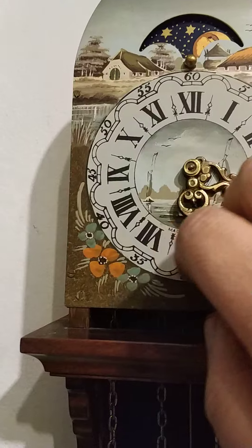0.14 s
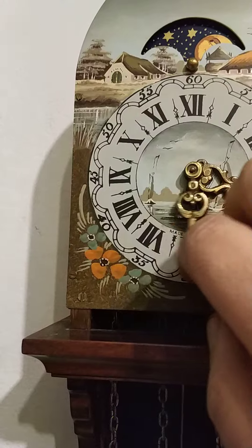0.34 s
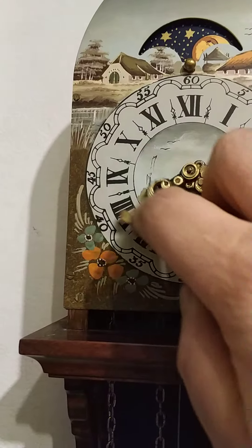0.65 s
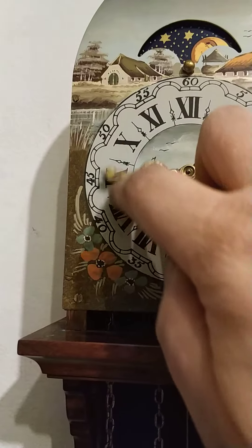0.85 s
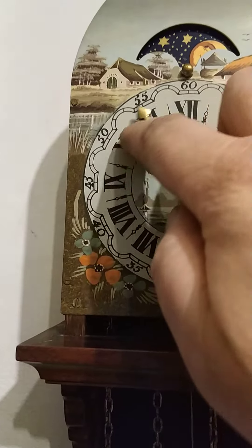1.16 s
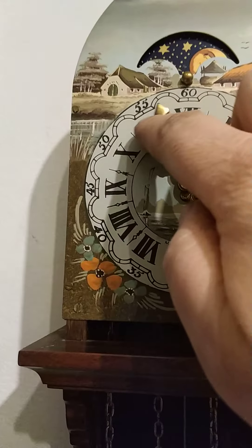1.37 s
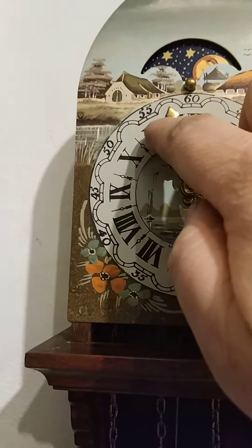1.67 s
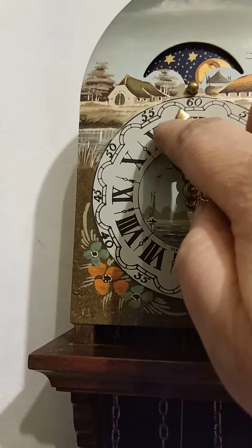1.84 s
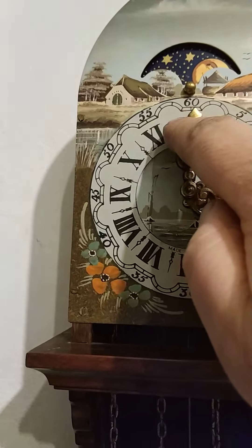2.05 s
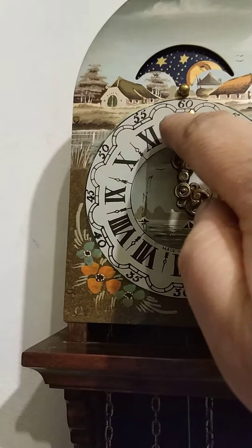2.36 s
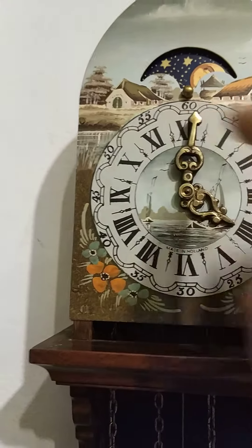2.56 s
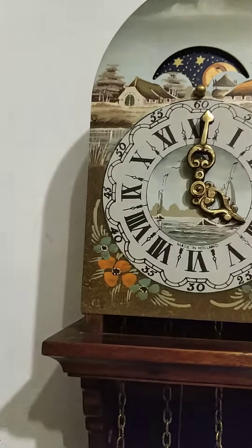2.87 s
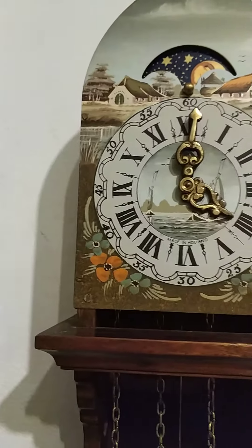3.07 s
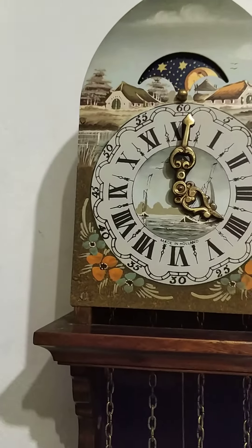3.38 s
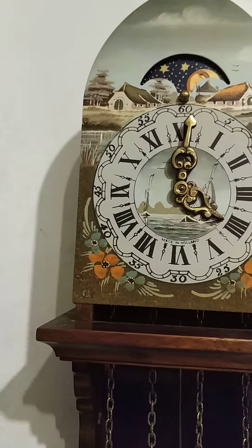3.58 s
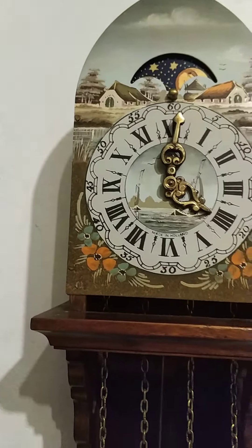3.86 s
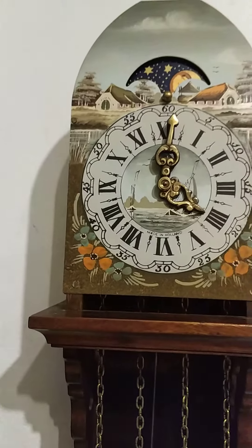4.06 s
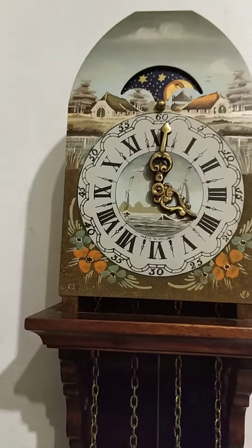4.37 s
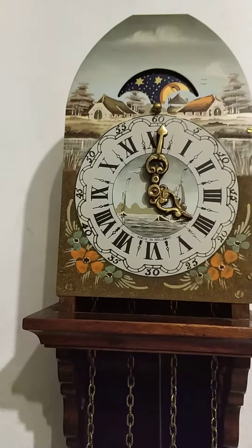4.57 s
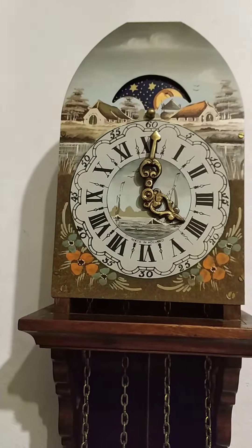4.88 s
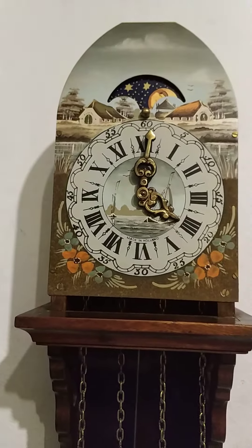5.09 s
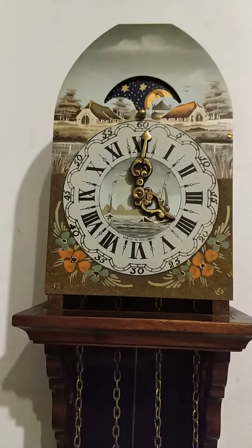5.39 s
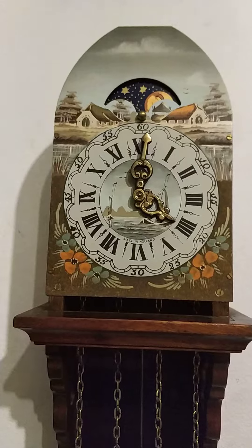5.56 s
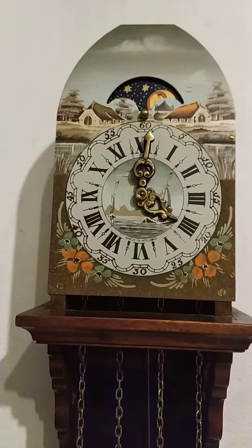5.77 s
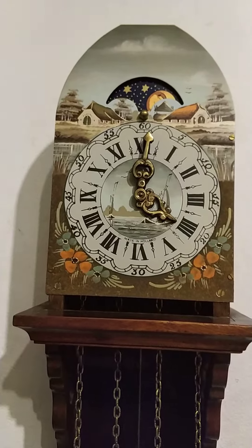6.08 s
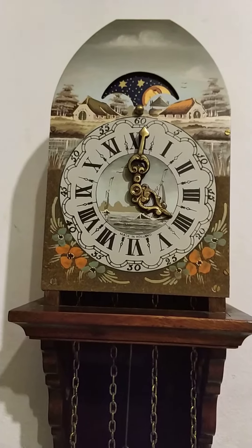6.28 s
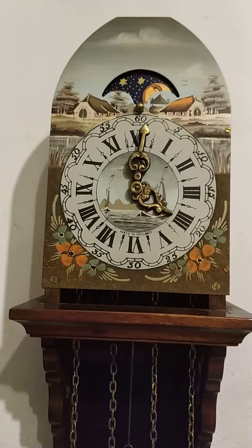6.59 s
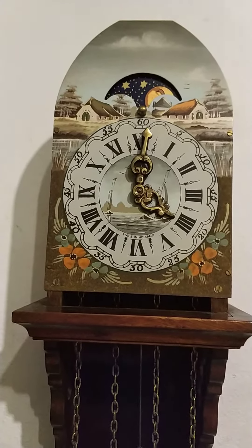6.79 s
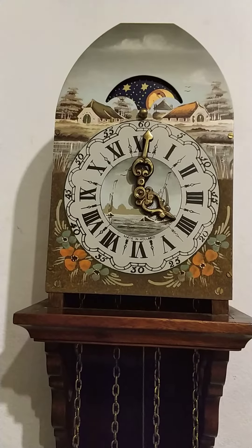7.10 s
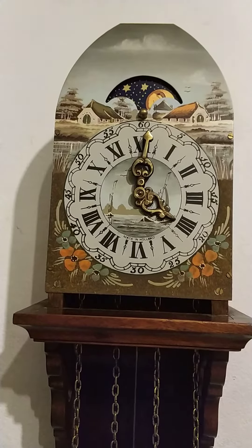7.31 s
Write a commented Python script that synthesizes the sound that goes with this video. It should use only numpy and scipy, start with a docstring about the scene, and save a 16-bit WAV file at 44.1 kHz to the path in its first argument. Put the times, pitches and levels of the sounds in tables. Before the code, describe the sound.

Quiet ticking and faint metallic hum, then a small rattling drop, a thin mechanical whirr and three clear, long-ringing bell strokes from a pendulum clock.

```python
"""Wall clock striking three

A hand turns a pendulum wall clock to the hour in a quiet room, close to a phone that slowly backs away.
The bell still hums from an earlier blow; a lever drops, the strike train whirrs and the hammer hits three times.
The escapement ticks throughout and two further clocks tick faintly elsewhere in the room.
Knocks are scraping noise that rings small parts, the bell is beating sine pairs, train and room are shaped noise."""
import sys
import numpy as np
from scipy import signal
from scipy.fft import rfft, irfft
from scipy.io import wavfile
from scipy.ndimage import uniform_filter1d

SR = 44100
rng = np.random.default_rng(int(sys.argv[2]) if len(sys.argv) > 2 else 0)


def natural_amplitude(level_db):
    """Convert a level in decibels to a linear amplitude factor, elementwise."""
    exponent = np.asarray(level_db, float) / 20
    return 10 ** exponent


def materialize(psi):
    """Save the field psi as 16-bit PCM at rate SR to the path in sys.argv[1].

    A 1-D psi becomes a single channel; in a 2-D psi each row is a channel.
    """
    bounded = np.clip(np.atleast_2d(psi).T, -1, 1)
    quanta = np.round(bounded * 32767).astype(np.int16)
    wavfile.write(sys.argv[1], SR, quanta)


N = 328104  # samples, about 7.4 s

# Hammer blows, levels before each layer's own gain: (time [s], peak [dB], wooden thud peak [dB],
# faint soft onset just before the blow [dB], sag of the train under the lift [dB])
BLOW_TABLE = [(3.6674, -12, -29.5, -29, -12), (5.166, -13, -32, -31.5, -11.5), (6.632, -11, -28, -38, -21)]
# Resonances of the hollow wooden case: (frequency [Hz], relative level [dB], time to fall 60 dB [s])
CASE_MODES = [(318, -5.5, 0.4), (384, -4, 0.27), (468, 2.5, 0.086), (513, -2.5, .08), (513.6, -24, 3.3),
              (234, -9, .07)]
# Resonances of the movement's plate: (frequency [Hz], relative level [dB], time to fall 60 dB [s])
PLATE_MODES = [(923.6, -1.5, 0.062), (1170, -1, 0.011), (1675, -1.5, .05), (1749, 2, .03),
               (2430, -1.5, 0.005)]
# Resonances of the wheels: (frequency [Hz], relative level [dB], time to fall 60 dB [s])
WHEEL_MODES = [(3474, 11.5, 0.014), (4160, 17.5, 0.0022), (4800, -4, 0.009), (8000, -22, 0.0072),
               (9600, -29.5, 0.041)]


def level(x, db):
    """Scale to an rms level."""
    return x * natural_amplitude(db) / np.sqrt(np.mean(x ** 2))


def band(x, hz, width):
    """Two-pole resonance, gain 1 at the centre."""
    return signal.lfilter(*signal.iirpeak(hz, hz / width, fs=SR), x)


def flicker(rate, db):
    """Gain that wanders at random about rate times a second."""
    steps = rng.standard_normal(999)
    return natural_amplitude(db * np.interp(np.arange(N) / SR * rate, np.arange(999), steps))


def every(period_s, first):
    """Repeat a (time [s], level [dB], ..) beat to the end, each time a little louder or softer."""
    scatter_db = 1.5
    s = np.arange(first[0], N / SR, period_s)
    return np.c_[s, first[1:] + scatter_db * rng.standard_normal((len(s), 1))]


def knocks(events, modes, contact_s):
    """Each (time [s], peak [dB]) event shakes the modes with its own short scrape of noise."""
    out = np.zeros(N + 2 * SR)
    t = np.arange(int(0.8 * SR)) / SR
    ring = sum(natural_amplitude(db) * np.sin(2 * np.pi * hz * t) * 1000.0 ** (-t / t60) for hz, db, t60 in modes)
    press = t[:4096] / contact_s
    force = (1 - np.exp(-3 * press)) ** 2 * np.exp(-press)  # rises fast and dies away
    for s, db in events:
        scrape = rng.standard_normal(4096) * force
        hit = np.diff(signal.fftconvolve(ring, scrape))  # small parts radiate little bass
        start = int(s * SR)
        out[start:start + len(hit)] += hit * natural_amplitude(db) / np.abs(hit).max()
    return out[:N]


def room():
    """Still air and microphone hiss: coloured noise whose half-octave bands waver on their own."""
    # Tone colour of the hiss: (frequency [Hz], relative level per Hz [dB])
    hiss_colour = [(100, -17.5), (250, -11.5), (500, -18.5), (1200, -22.5), (2000, -22.5), (3000, -23),
                   (5300, -28), (9100, -29), (11000, -56)]
    hz = np.fft.rfftfreq(N, 1 / SR) + 1
    colour_hz, colour_db = np.transpose(hiss_colour)
    colour = natural_amplitude(np.interp(np.log(hz), np.log(colour_hz), colour_db))
    noise = rfft(rng.standard_normal(N)) * colour
    out = 0
    for octave in np.arange(5, 14.5, 0.5):  # band centres are 2 ** octave Hz
        share = np.clip(1 - 2 * np.abs(np.log2(hz) - octave), 0, 1)
        out = out + irfft(noise * share, N) * flicker(7.9, 2.0)
    return level(out, -69)


def clocks():
    """Two other clocks blurred by distance, and faint stray creaks and ticks from all round."""
    # Body of the dull clock: (frequency [Hz], relative level [dB], time to fall 60 dB [s])
    dull_body = [(860, 6, 0.011), (841, -7.5, 0.31), (960, -9.5, 0.052)]
    # Treble of the dull clock: (frequency [Hz], relative level [dB], time to fall 60 dB [s])
    dull_bright = [(2232, -1.5, 0.046), (4000, -14, 0.035), (4530, -3, 0.013), (5440, -29, .04)]
    # Body of the thin clock: (frequency [Hz], relative level [dB], time to fall 60 dB [s])
    thin_body = [(857, -9, 0.2), (1635, -1, 0.08), (5230, -31, 0.048)]
    # First beats of the dull clock: (time [s], body peak [dB], treble peak [dB])
    dull_tick = (.587, -52.5, -54)
    dull_tock = (1.185, -58, -58)
    # First beats of the thin clock: (time [s], peak [dB])
    thin_tick = (.3267, -52.5)
    thin_tock = (.947, -51.5)
    dull_period_s, thin_period_s = 1.2284, 1.3323

    beats = np.vstack([every(dull_period_s, dull_tick), every(dull_period_s, dull_tock)])
    dull = knocks(beats[:, :2], dull_body, 0.014) + knocks(beats[:, ::2], dull_bright, 0.022)

    thin = knocks(every(thin_period_s, thin_tick), thin_body, 0.015)
    thin = thin + knocks(every(thin_period_s, thin_tock), dull_body, 0.0041)

    stray = rng.random((60, 2)) * [N / SR, 12.0] + [0, -70.0]  # (time [s], level [dB])
    creaks = knocks(stray[::2], dull_body, 0.019) + knocks(stray[1::2], PLATE_MODES, 0.011)
    creaks = creaks + natural_amplitude(4) * knocks(stray[::3], dull_bright, 0.0069)
    return dull + thin + creaks


def train():
    """Pinion teeth patter densely on the plate while the fly spins; each resonance flutters alone."""
    # Resonances under the patter: (frequency [Hz], width [Hz], relative level [dB])
    patter_modes = [(951, 100, -16), (1705, 90, 0.5), (2140, 990, -8), (3440, 450, 0.5), (4167, 71, 6.5),
                    (4360, 90, 8.5), (5200, 100, -6.5), (5940, 1200, -42), (9150, 240, -9)]
    # How the train sags around each blow: (time from the blow [s], share of the sag [0-1])
    lift_shape = [(-0.39, 0), (-.45, .2), (-0.22, 0.65), (-0.095, 0.8), (-.05, 0.11), (0.8, 0),
                  (0.3, 0.018)]
    start_s, spin_up_s = 2.193, 0.16
    t = np.arange(N) / SR

    strikes = rng.random(N) < 700 / SR  # about 700 a second
    teeth = strikes * rng.standard_normal(N) * natural_amplitude(3.5 * rng.standard_normal(N))
    push = level(teeth, 0) + 1.9 * rng.standard_normal(N)
    body = 0
    for hz, width, db in patter_modes:
        ringing = level(band(push, hz, width), 0) * np.sqrt(width)
        body = body + natural_amplitude(db) * flicker(30, 3.5) * ringing

    sag_db = 0
    for blow in BLOW_TABLE:
        sag_db = sag_db + blow[-1] * np.interp(t - blow[0], *np.transpose(lift_shape), left=0, right=0)
    spin_up = np.clip((t - start_s) / spin_up_s, 0, 1)
    return level(body, -56.5) * natural_amplitude(sag_db) * spin_up


def movement():
    """Every tick rings the plate and the wheels in its own balance; the lever's bounces are brief but blunt."""
    # Escapement ticks: time [s]
    tick_times = [0.4202, 1.0012, 1.595, 2.167, 2.7852, 3.3569, 3.927, 4.537, 5.13, 5.7153, 6.317, 6.8902]
    # Clicks of levers under the turning hand, before gain: (time [s], plate peak [dB], wheel peak [dB])
    lever_clicks = [(1.3089, -42, -36.5), (1.4462, -37.5, -39.5)]
    # A dropped lever bounces to rest, before gain: (time [s], plate peak [dB], wheel peak [dB])
    lever_bounces = [(2.0206, -42, -32.5), (2.0266, -28, -31), (2.054, -31.5, -39.5), (2.058, -52, -30),
                     (2.0672, -30.5, -45), (2.081, -35, -40.5), (2.091, -53, -39.5), (2.1015, -36, -51),
                     (2.110, -38, -46)]
    # A finger lifts a lever that grates on its stop: (time [s], peak [dB])
    grate_times = [(1.48, -41), (1.497, -49)]
    # Resonance of that lever: (frequency [Hz], relative level [dB], time to fall 60 dB [s])
    grate_modes = [(2770, -1, 0.024)]
    # Faint bright flecks of sound near the dial: (time [s], peak [dB])
    fleck_times = [(.01, -56.5), (.51, -64), (.89, -59), (1.09, -63), (1.16, -54), (1.23, -59), (1.39, -65),
                   (1.66, -63), (1.87, -59)]
    # Resonances of the flecks: (frequency [Hz], relative level [dB], time to fall 60 dB [s])
    fleck_modes = [(3740, -8, 0.028), (4350, -6, 0.037), (5630, 3, 0.039)]
    # Soft low bumps in the wooden case: (time [s], peak [dB])
    case_bumps = [(.1, -52.5), (1.385, -61.5), (2.36, -58.5), (3.33, -60)]

    # ticks fade, and grow duller faster still, as the phone backs away
    s = np.array(tick_times)
    plate_scatter, wheel_scatter = 2 * rng.standard_normal((2, len(s)))  # dB
    beats = np.c_[s, -41 - 0.13 * s + plate_scatter, -36.5 - 2 * s + wheel_scatter]
    # a faint soft onset is heard 12 ms before each blow
    onsets = [(blow[0] - 0.012, blow[3], blow[3] - 13.5) for blow in BLOW_TABLE]
    ticks = np.vstack([beats, lever_clicks, onsets])
    soft = knocks(ticks[:, :2], PLATE_MODES, 0.0069)
    soft = soft + natural_amplitude(3.5) * knocks(ticks[:, ::2], WHEEL_MODES, 0.0028)

    lever = np.array(lever_bounces)
    hard = knocks(lever[:, :2], PLATE_MODES, 0.0015)
    hard = hard + natural_amplitude(12) * knocks(lever[:, ::2], WHEEL_MODES[:3], 0.0015)

    # 24 small rattles at random moments within 0.11 s of the drop
    when, softness = rng.random((2, 24))
    rattles = np.c_[2.022 + 0.11 * when, -34 - 3 * when - 6 * softness]
    rattle = knocks(rattles, WHEEL_MODES[:3], 0.0026)
    blunt = uniform_filter1d(hard + rattle, size=4)  # softens the extreme treble

    grate = knocks(grate_times, grate_modes + PLATE_MODES[-1:], 0.0044)
    flecks = knocks(fleck_times, fleck_modes, 0.0062)
    bumps = knocks(case_bumps, CASE_MODES, 0.012)
    return soft + blunt + grate + flecks + bumps


def hammer():
    """The hammer chatters on the bell, cracks through the movement and thuds in the hollow case."""
    # Short-lived bell resonances: (frequency [Hz], relative level [dB], time to fall 60 dB [s])
    clang_modes = [(1424, -22, 0.35), (3423, -7, .08), (5980, -11.5, 0.013), (8860, -7.5, 0.05)]
    s, peak_db, thud_db = np.array(BLOW_TABLE).T[:3]
    blows, thuds = np.c_[s, peak_db], np.c_[s, thud_db]
    metal = WHEEL_MODES + PLATE_MODES
    clang = knocks(blows, clang_modes, 0.006)
    crack = knocks(blows, metal, 0.014) + natural_amplitude(0.5) * knocks(blows, metal, 0.00098)
    thud = knocks(thuds, CASE_MODES, 0.00025) + natural_amplitude(-11.5) * knocks(thuds, CASE_MODES, 0.033)
    return natural_amplitude(-2) * clang + natural_amplitude(-12) * crack + thud


def twins(k):
    """One bell partial split into two close tones that beat; every blow leaves them in a new balance."""
    # Each pair of tones: (lower twin [Hz], beat rate [Hz])
    pair_tones = [(1319.81, 5.69), (3399.95, 1.69), (5965.8, 3.5), (8907.2, .85)]
    # Time to fall 60 dB: (lower twin [s], upper twin [s])
    pair_decays = [(10, 18.), (7.8, 2.28), (2.69, 2.445), (0.98, 0.55)]
    # Ring left by each blow or jolt, before later gains, one list a partial (hum, mid, ting, top):
    # (time [s], lower twin [dB], upper twin [dB], delay to the first swell [s])
    pair_rings = [
        [(0, -58, -58.5, 0.029), (2.06, -47.5, -49.5, .16), (3.67, -40, -44, 0.011), (5.169, -48, -40.5, .16),
         (6.637, -49, -44, 0.13)],
        [(0, -39, -50.5, 0.35), (2.06, -63, -66.5, 0.31), (3.67, -37.5, -43.5, .56), (5.169, -48.5, -36, 0.16),
         (6.637, -55.5, -37.5, 0.069)],
        [(3.67, -22, -24, 0.16), (5.169, -23, -18, .19), (6.637, -30, -28, .2)],
        [(3.67, -16, -16, .64), (5.169, -21, -11.5, .72), (6.637, -19.5, -16.5, 0.83)],
    ]
    # Each partial swells and sinks as the phone moves through the room's standing waves,
    # one list a partial: (time [s], gain [dB])
    pair_sway = [
        [(0, 0.5)],
        [(1.1, 0.35), (2., -2.5), (4.4, 0.5), (4.63, -3), (4.85, 2.5), (5.13, -1), (5.2, 0.3), (5.85, 1.5),
         (5.99, -11.5), (6.27, -18), (6.4, 2.5), (6.62, 8.5), (6.66, 0.3)],
        [(3.7, 6.5), (3.76, -3), (3.8, -11.5), (3.88, 2.5), (4.1, -4.5), (4.5, -5), (4.9, 2.5), (5.15, 8.5),
         (5.18, -0.43)],
        [(3.8, 0.4), (3.95, -3), (4.07, 7), (4.29, -10), (4.39, 2), (4.55, -5), (5.36, 0.9), (5.41, -4.5),
         (5.47, 4.5), (5.6, -2.2)],
    ]

    hz, beat_hz = pair_tones[k]
    low_t60, high_t60 = pair_decays[k]
    rings = np.array(pair_rings[k])
    t = np.arange(N) / SR
    last = np.searchsorted(rings[:, 0], t, side="right") - 1  # latest blow, -1 before the first
    start, low_db, high_db, swell = rings[np.maximum(last, 0)].T
    age = np.maximum(t - start, 0)

    # complex envelopes, as seen from the lower twin: the upper one turns at the beat rate
    lower = natural_amplitude(low_db) * 1000.0 ** (-age / low_t60)
    upper = natural_amplitude(high_db) * 1000.0 ** (-age / high_t60) * np.exp(2j * np.pi * beat_hz * (age - swell))
    sway = natural_amplitude(np.interp(t, *np.transpose(pair_sway[k])))
    shape = (lower + upper) * (last >= 0) * sway
    rise = int(0.0025 * SR)  # the hammer stays in contact for a moment
    smooth = uniform_filter1d(shape.real, rise) + 1j * uniform_filter1d(shape.imag, rise)
    return (smooth * np.exp(2j * np.pi * hz * t)).imag


def opening_gain():
    """Level change over the first seconds: a steady rise with short, regular drops in loudness."""
    # Shape of the gain: (end [s], rise [dB per s], centre of first drop [s], drop width [s], drop depth [0-1])
    gain_shape = (2.03, 3.8, 0.057, 0.0076, 0.84)
    end, rise_db, first, width, depth = gain_shape
    rate = 5.775  # drops a second
    t = np.arange(N) / SR
    since = (((t - first) * rate + 0.5) % 1 - 0.5) / rate  # seconds from the nearest drop
    gain = natural_amplitude(rise_db * t) * (1 - depth * np.exp(-(since / width) ** 2))
    return np.where(t < end, gain, 1)


def bell():
    """Four long split partials, hum, mid, ting and top: the faint early hum beats and rings on."""
    return twins(0) * opening_gain() + twins(1) + twins(2) + twins(3)


def scene():
    """Small clicks echo in the room as decaying noise; the other layers are added without this echo."""
    near = movement() + clocks()
    t = np.arange(SR // 2) / SR
    echo_t60_s = 0.18
    tail = rng.standard_normal(len(t)) * 1000.0 ** (-t / echo_t60_s) * (t > 0.004)
    echo = signal.fftconvolve(near, tail / np.sqrt(np.sum(tail ** 2)))[:N]
    mix = near + natural_amplitude(-6) * echo + hammer() + bell() + train() + room()
    return mix[None]  # one channel


def band_limit(x):
    """A steep low-pass at the top of the band."""
    return signal.sosfilt(signal.butter(12, 11160, fs=SR, output="sos"), x)


def record(dry):
    """The phone cuts the bass below 200 Hz and drops steeply above 10 kHz."""
    bass_cut = signal.butter(3, 200, "highpass", fs=SR, output="sos")
    treble_cut = signal.butter(12, 10000, fs=SR, output="sos")
    mix = signal.sosfilt(treble_cut, signal.sosfilt(bass_cut, dry))
    return band_limit(mix)


dry = scene()
out = record(dry)
materialize(out)
```